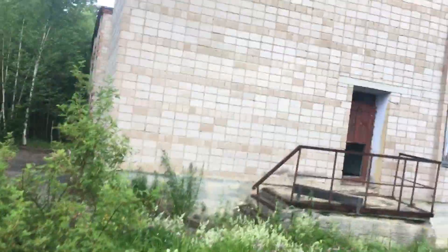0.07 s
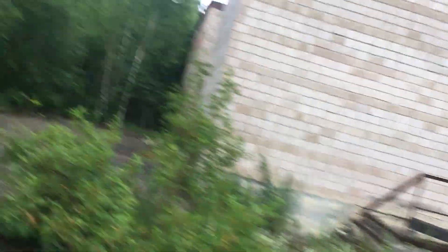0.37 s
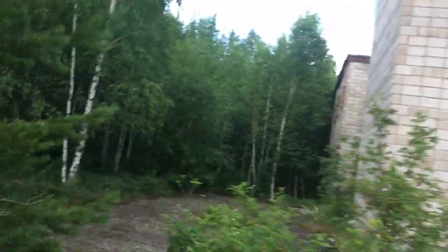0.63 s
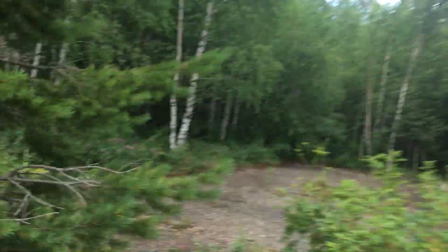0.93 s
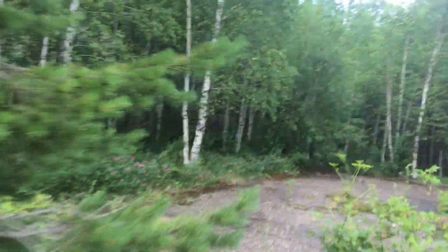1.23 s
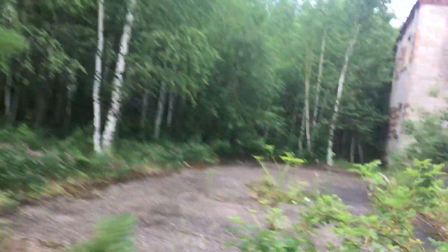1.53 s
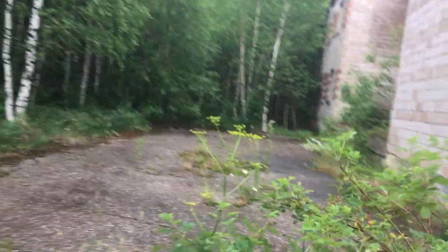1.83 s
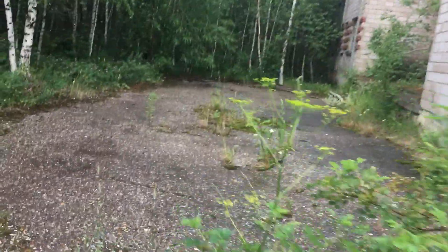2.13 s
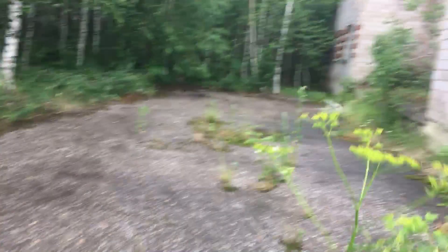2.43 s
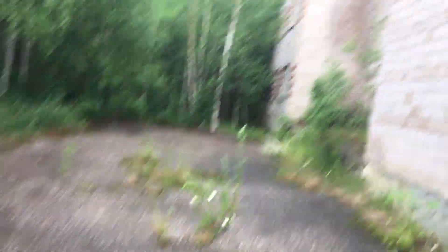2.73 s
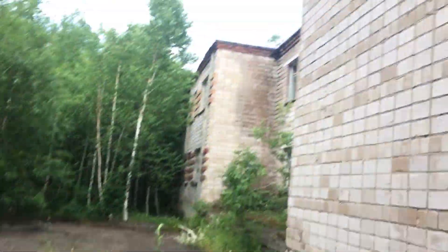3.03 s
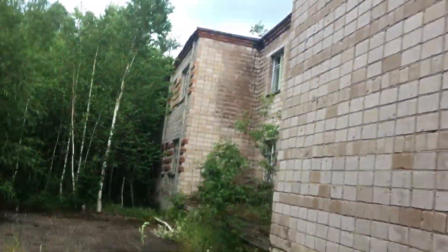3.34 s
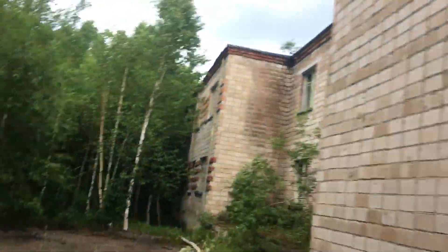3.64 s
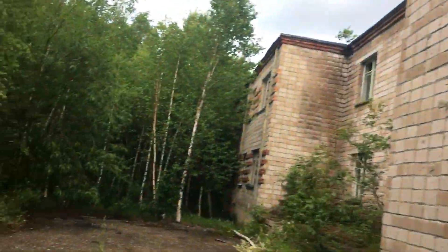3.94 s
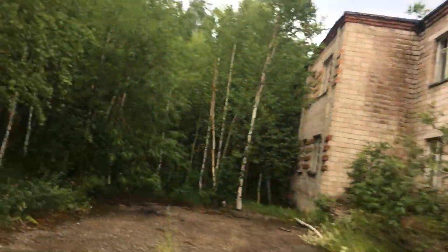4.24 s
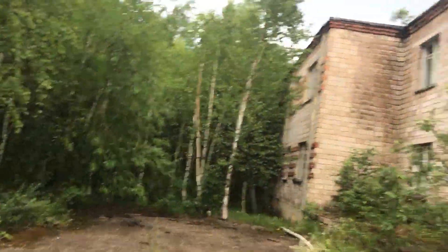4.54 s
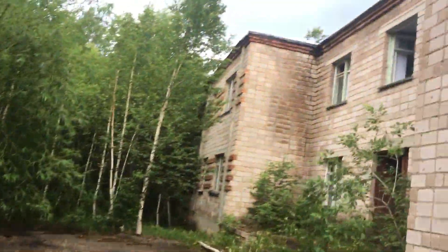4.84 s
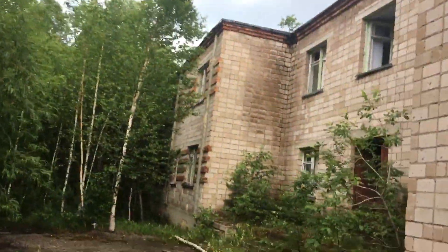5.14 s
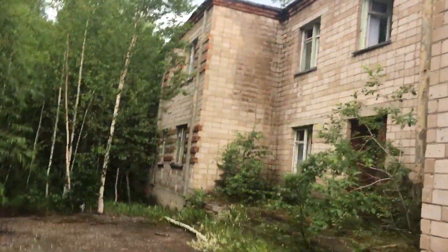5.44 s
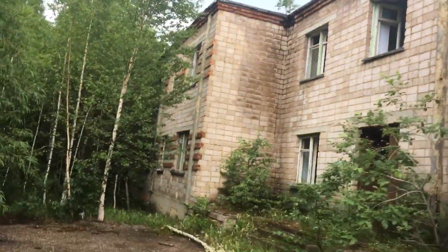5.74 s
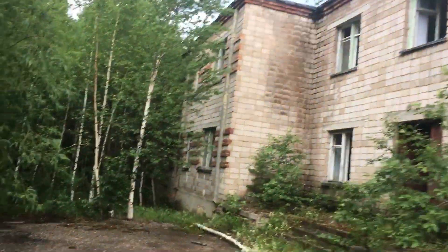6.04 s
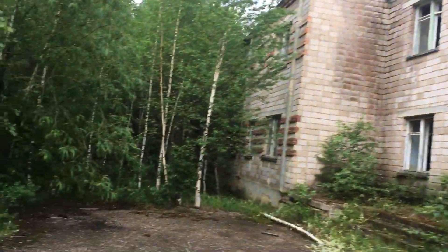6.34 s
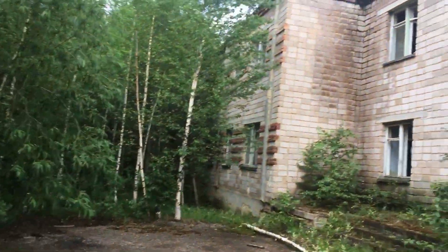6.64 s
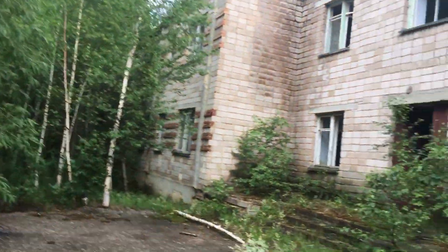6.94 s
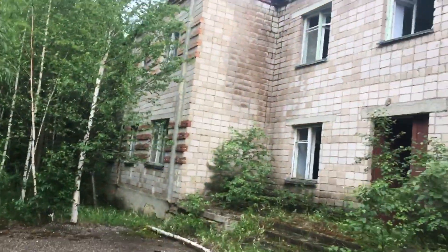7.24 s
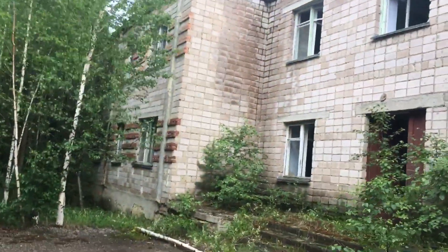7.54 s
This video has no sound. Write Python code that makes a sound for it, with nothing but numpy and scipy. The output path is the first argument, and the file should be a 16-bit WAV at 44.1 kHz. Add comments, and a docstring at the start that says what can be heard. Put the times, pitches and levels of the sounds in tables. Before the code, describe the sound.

Someone walks slowly through overgrown woodland, grit and leaves crunching, twigs cracking underfoot and foliage brushing past a nylon sleeve.

```python
"""A gravel path through undergrowth, walked slowly with a camera in hand. Dry twigs snap and splinter
underfoot; grit, leaves and grass crackle as tiny fractures; soles grind earth. Near the microphone stems tick,
foliage scrapes past, a nylon sleeve swishes and catches, and hollow rasps come in runs. A little wind buffets
the microphone at first with a few low thumps; the woods hush behind."""
import sys
import numpy as np
from scipy import signal
from scipy.fft import rfft, irfft, next_fast_len
from scipy.io import wavfile
from scipy.ndimage import uniform_filter1d, map_coordinates

SR = 44100
rng = np.random.default_rng(int(sys.argv[2]) if len(sys.argv) > 2 else 0)


def store_pcm(level_fs):
    """Save levels as 16-bit WAV."""
    pcm = np.round(np.clip(level_fs, -1, 1) * 32767).astype(np.int16)
    wavfile.write(sys.argv[1], SR, np.atleast_2d(pcm).T)


N = 343186

# twigs and stones cracking: time_s, level_db, pitch_hz
SNAPS = [(0.0434, -22.5, 2640), (0.084, -29, 4200), (0.091, -29, 4500), (0.1205, -32.5, 2140),
         (0.584, -31, 4600), (0.59, -31, 3250), (0.614, -34, 3000), (0.661, -27, 2680),
         (0.698, -33.5, 2400), (0.728, -34, 2120), (0.754, -30, 2210), (0.794, -35.5, 2240),
         (0.844, -31, 2520), (1.097, -29.5, 3160), (1.314, -23, 4060), (1.335, -45, 2900),
         (1.3605, -35, 3300), (1.386, -28.5, 3670), (1.526, -36.5, 3400), (1.6148, -32.5, 2300),
         (1.6658, -38, 1900), (1.804, -31, 4360), (1.937, -40, 2900), (2.0148, -39, 2700),
         (2.1256, -37, 2080), (2.435, -35, 1660), (2.605, -34, 3500), (2.7732, -27.5, 5000),
         (3.072, -22, 1760), (3.1193, -30, 5700), (3.1793, -35, 1950), (3.3298, -34, 3280),
         (3.342, -33, 3540), (3.3686, -27, 3070), (3.388, -35, 3500), (3.716, -36.5, 2400),
         (3.8146, -22.5, 2620), (4.0755, -30.5, 2170), (4.5726, -32, 2020), (4.634, -36.5, 3700),
         (4.8557, -30.5, 1960), (4.8668, -33, 2100), (4.8685, -28, 3300), (4.8728, -15.5, 1920),
         (4.8729, -16.5, 4150), (4.931, -35, 3100), (4.935, -39, 2400), (5.2537, -29.5, 2050),
         (5.446, -30, 4540), (5.46, -34, 3100), (5.632, -36, 3300), (5.988, -34, 2900), (6.0331, -26, 1660),
         (6.0559, -23, 7200), (6.073, -25, 3100), (6.1687, -24.5, 3470), (6.196, -37, 2330),
         (6.202, -33, 3300), (6.207, -31, 3600), (6.2335, -23, 5150), (6.2374, -18, 3130),
         (6.2467, -18.5, 2870), (6.255, -30, 2220), (6.277, -37, 2900), (6.287, -33.5, 2090),
         (6.3136, -26, 4580), (6.328, -34, 2800), (6.358, -31, 3900), (6.3804, -28.5, 2460),
         (6.392, -28.5, 2600), (6.41, -34, 2200), (6.4334, -29, 2580), (6.469, -42, 2600),
         (6.499, -23.5, 3600), (6.52, -32, 2040), (6.5257, -30.5, 2440), (6.592, -37, 3400),
         (6.6578, -35.5, 2170), (6.713, -34.5, 2760), (6.73, -33.5, 2220), (6.792, -32, 3660),
         (6.941, -36.5, 2000), (7.0994, -7, 2090), (7.1022, -25, 2330), (7.1196, -19, 2500),
         (7.214, -33.5, 2140), (7.3614, -36.5, 2720), (7.751, -36, 3300)]
# stones under a break: pitch_hz, level_db, heavy_break_t60_s
STONE_MODES = [(1890, -6, 0.008), (2385, -11.5, 0.02)]
# twigs tearing: start_s, length_s, level_db
SPLINTERS = [(0.017, 0.0065, -38), (1.316, 0.014, -52), (3.518, 0.01, -46.5), (3.595, 0.01, -42),
             (3.892, 0.0061, -43), (3.972, 0.008, -45), (4.08, 0.012, -43.5), (6.744, 0.0093, -50)]
# rustle of the walk: time_s, grit_db, leaves_db, grass_db
RUSTLE_LEVELS = [(0.0, -51.5, -47.5, -46.5), (0.2, -56.5, -52, -47), (0.36, -57.5, -63.5, -64.5),
                 (0.68, -51.5, -55, -58), (0.91, -58, -60, -56.5), (1.32, -57.5, -53.5, -55.5),
                 (1.55, -58, -64, -65), (1.93, -61.5, -59, -55.5), (2.23, -59.5, -61, -64),
                 (2.31, -66, -64, -68), (2.36, -49, -62.5, -68), (2.41, -63, -57.5, -56.5),
                 (2.66, -66.5, -61, -57), (3.05, -57, -57, -52.5), (3.5, -62, -56, -57.5),
                 (3.68, -61, -64, -64), (3.86, -62.5, -55.5, -60), (4.25, -61.5, -66, -66.5),
                 (4.55, -69, -66.5, -73), (4.8, -64, -61, -62), (5.0, -58, -61, -61), (5.09, -59, -56, -57),
                 (5.2, -66, -57, -61), (5.48, -59.5, -56, -61.5), (5.56, -59, -58, -62),
                 (5.61, -61, -59, -62), (5.94, -63.5, -57, -63), (6.05, -58, -51, -61),
                 (6.15, -61, -55.5, -53), (6.35, -56.5, -56, -56), (6.72, -58.5, -56.5, -60),
                 (7.01, -63, -62, -65), (7.25, -59, -59.5, -66), (7.48, -60, -65.5, -66),
                 (7.78, -62.5, -64, -62)]
# footfalls crushing litter: start_s, decay_s, lift_db
CRUNCHES = [(1.313, 0.013, 10), (2.365, 0.022, 10), (2.825, 0.034, 15), (3.33, 0.017, 3),
            (3.585, 0.02, 15.5), (6.742, 0.0077, 14)]
# soles on soft ground: start_s, length_s, level_db, pitch_hz
SCUFFS = [(0.039, 0.032, -48.5, 750), (2.364, 0.079, -57.5, 650), (2.822, 0.1, -57, 526),
          (3.024, 0.22, -58, 634), (3.589, 0.052, -49.5, 650), (3.891, 0.036, -52, 720),
          (3.998, 0.27, -63, 420), (4.933, 0.39, -57, 586), (5.999, 0.048, -56, 520),
          (6.598, 0.26, -61, 410)]
# grinding earth: pitch_ratio, density_db
SOIL_SPECTRUM = [(0.15, -32), (0.5, -2), (0.85, 2.5), (1.15, 1), (1.8, -5.5), (3.5, -12), (7, -38)]
# stems ticking: start_s, level_db, pitch_hz
STEM_TICKS = [(0.9348, -27, 13000), (3.4663, -28, 13000), (4.2937, -31, 13500), (4.4745, -31, 13500),
              (4.7449, -18, 13000), (4.8155, -23, 10500), (4.943, -21, 14800), (5.038, -20, 13400),
              (5.0577, -23, 14000), (5.067, -26, 13500), (5.1003, -24, 13500), (5.1235, -19, 14800),
              (5.128, -25, 14800), (5.2829, -13.5, 14800), (5.388, -15.5, 13200), (6.3135, -5.5, 13600),
              (7.5992, -21, 13400)]
# sleeve strokes: start_s, length_s, level_db
SWISHES = [(1.15, 0.029, -54), (1.459, 0.0053, -62), (1.714, 0.035, -49), (1.8, 0.29, -58.5),
           (2.19, 0.11, -60), (2.548, 0.059, -47), (2.735, 0.075, -52.5), (3.092, 0.022, -47.5),
           (7.151, 0.0048, -45), (7.161, 0.008, -45), (7.191, 0.024, -48)]
# sleeve weave: freq_hz, density_db
NYLON_SPECTRUM = [(300, -31), (900, -15), (1650, -15), (2300, -23), (3500, -4), (4300, -6.5), (5300, 3),
                  (6200, -3), (7700, -16), (10000, -2.5), (11500, -15), (15500, -12.5)]
# foliage against the legs: start_s, length_s, level_db
BRUSHES = [(0.047, 0.027, -37), (0.158, 0.077, -46), (2.925, 0.05, -52), (3.51, 0.058, -50.5),
           (3.572, 0.042, -53), (3.889, 0.018, -51), (5.345, 0.071, -53), (5.495, 0.058, -51.5),
           (5.856, 0.0029, -42.5), (6.008, 0.035, -48), (6.06, 0.07, -64)]
# scraping foliage: freq_hz, density_db
FOLIAGE_SPECTRUM = [(150, -5), (500, -3.5), (1100, -8.5), (1750, -7), (2500, -6.5), (4200, 3.5),
                    (7000, -0.5), (10000, 1), (15500, -15)]
# sleeve catching and slipping: start_s, level_db
CATCHES = [(1.4753, -25.5), (1.479, -23), (7.1522, -29.5)]
# taut nylon: pitch_hz, level_db
CATCH_MODES = [(3500, -15), (5050, 3), (9700, -6)]
# runs of close rasps: start_s, length_s, period_s, level_db
RASP_RUNS = [(0.327, 0.6, 0.085, -60.5), (0.997, 0.43, 0.05, -54.5), (1.504, 0.19, 0.05, -58.5),
             (1.752, 0.2, 0.086, -57), (2.007, 0.16, 0.066, -54.5), (2.249, 0.26, 0.087, -60.5),
             (2.593, 0.19, 0.071, -54.5), (2.823, 0.05, 0.1, -43.5), (3.179, 0.24, 0.094, -57.5),
             (3.512, 0.12, 0.084, -53.5), (5.029, 0.18, 0.131, -55), (5.206, 0.16, 0.065, -57.5),
             (5.448, 0.29, 0.089, -55.5), (5.798, 0.36, 0.1, -54), (6.535, 0.55, 0.11, -58),
             (7.284, 0.53, 0.12, -59)]
# hollow resonances of a rasp: freq_hz, density_db
RASP_SPECTRUM = [(300, -10.5), (1150, -26), (1550, 4), (1850, 2.5), (2450, -14.5), (3300, -7.5), (3800, -2),
                 (5200, -7), (6550, -2), (7600, -7), (9300, -2), (11500, -9), (14400, -12), (15800, -6)]
# wind thumps on the microphone: peak_s, peak_db, pitch_hz
BUMPS = [(0.391, -39.5, 120), (0.453, -32, 116), (0.519, -36, 75), (0.553, -33.5, 100), (0.934, -36.5, 39),
         (1.13, -47, 95), (1.485, -33.5, 90), (1.494, -38, 190), (1.592, -42.5, 95), (1.708, -40.5, 50)]
# one gust: time_s, level_db
GUST = [(0.0, -53.5), (0.354, -55.5), (0.45, -44.5), (0.958, -48.5), (0.984, -59), (1.146, -49), (1.3, -66)]
# puffs of air: start_s, length_s, level_db
PUFFS = [(0.05, 0.037, -58), (0.44, 0.15, -49), (1.36, 0.16, -53.5), (1.482, 0.03, -53),
         (1.65, 0.09, -54.5), (5.62, 0.42, -70), (6.03, 0.14, -54.5)]
# wind on the microphone: freq_hz, density_db
BUFFET_SPECTRUM = [(12, -26), (22, 10), (40, -1), (85, -4), (150, -14.5), (300, -20), (600, -21),
                   (1000, -31), (2000, -60)]
# hush of the trees: freq_hz, density_db
WOODS_SPECTRUM = [(20, 6.5), (60, 1.5), (130, -1), (300, -1), (600, -1.5), (1000, -8), (2000, -14),
                  (4000, -17.5), (9000, -15), (16000, -22.5)]


def twig_snaps(rise_cycles=0.62, ring_db=-17, ring_t60_s=0.012, hiss_db=-33, hiss_t60_s=0.038):
    """A break is one pulse and a faint hiss; fibres give way, the stick shivers and knocks on stones."""
    out, t = np.zeros(N), np.arange(2048) / SR
    for time_s, level_db, pitch_hz in SNAPS:
        snap = pulse(t * pitch_hz, rise_cycles)
        for late, detune in rng.random(size=(3, 2)):
            fibre_delay_s = 0.001 + 0.007 * late
            fibre_hz = pitch_hz * 2 ** (detune - 0.5)
            snap += amp(-15 - 5 * late) * pulse((t - fibre_delay_s) * fibre_hz, rise_cycles)
        shiver = rng.standard_normal(len(t)) * amp(-60 * t / ring_t60_s) * (t > 0.0005)
        ring = signal.fftconvolve(pulse(t * pitch_hz, rise_cycles=1.42), shiver)[:len(t)]
        ring *= amp(ring_db) * np.linalg.norm(snap) / np.linalg.norm(ring)
        knock = signal.fftconvolve(snap, stone_ring(t, level_db))[:len(t)] / np.sum(np.abs(snap))
        wood_damping = signal.butter(4, min(1.5 * pitch_hz, SR / 3), fs=SR, output="sos")
        wood = signal.sosfilt(wood_damping, snap + ring + knock)
        hiss = amp(hiss_db - 60 * t / hiss_t60_s) * rng.standard_normal(len(t))
        add(out, time_s - 1 / pitch_hz, amp(level_db - 0.1) * (wood + hiss))
    # thin sticks radiate no bass
    return signal.sosfilt(signal.butter(2, 520, "highpass", fs=SR, output="sos"), out)


def stone_ring(t, break_db, heavy_break_db=-15, pitch_spread=0.035):
    """No two stones ring alike; a heavier break rings them longer."""
    stretch = amp(0.24 * (break_db - heavy_break_db))
    ring = np.zeros(len(t))
    for pitch_hz, level_db, t60_s in STONE_MODES:
        detuned_hz = pitch_hz * (1 + pitch_spread * rng.normal())
        ring += amp(level_db - 60 * t / (t60_s * stretch)) * np.cos(2 * np.pi * detuned_hz * t)
    return ring


def twig_splinters():
    """A twig tears in a ragged run of small fractures."""
    fractures = grains(per_s=1500, centre_hz=1970, spread_oct=0.24, rise_cycles=0.73, scatter_db=4.5)
    return strokes(SPLINTERS, edge_share=0.79) * fractures


def undergrowth():
    """Weight crushes grit, leaves and grass in a fine crackle; small stones click out."""
    grit_db, leaves_db, grass_db = curves(RUSTLE_LEVELS)
    clumps = wobble(45)
    grit = amp(grit_db - 2.5 + 2 * clumps + 1.3 * wobble(150))
    grit *= grains(per_s=1400, centre_hz=2066, spread_oct=0.45, rise_cycles=0.7, scatter_db=1)
    leaves = amp(leaves_db - 1.53 + 2.3 * clumps)
    leaves *= grains(per_s=4500, centre_hz=5830, spread_oct=0.71, rise_cycles=1.39, scatter_db=3.5, n=130)
    grass = amp(grass_db - 1.44 + 1.7 * clumps + 3.4 * wobble(99))
    grass *= grains(per_s=4900, centre_hz=12160, spread_oct=0.464, rise_cycles=1.72, scatter_db=5, n=100)
    stones = amp((grit_db + leaves_db) / 2 - 4)
    stones *= grains(per_s=170, centre_hz=3700, spread_oct=0.95, rise_cycles=0.8, scatter_db=4, n=300)
    return amp(footfall_lift_db()) * patchy(grit + leaves + grass, depth_db=2.5) + stones


def footfall_lift_db(attack_s=0.00067):
    """A footfall crushes the litter at once: the rustle jumps, then decays."""
    out, t = np.zeros(N), np.arange(SR // 3) / SR
    for start_s, decay_s, lift_db in CRUNCHES:
        add(out, start_s, lift_db * (1 - np.exp(-t / attack_s)) * np.exp(-t / decay_s))
    return out


def sole_scuffs():
    """Soft earth gives way in a dull, uneven grinding; each step has its own resonance."""
    out = np.zeros(N)
    grinding = patchy(rng.standard_normal(N) * amp(3.7 * wobble(500)), depth_db=3, frame_samples=768)
    for start_s, length_s, level_db, pitch_hz in SCUFFS:
        spectrum = [(pitch_hz * ratio, density_db) for ratio, density_db in SOIL_SPECTRUM]
        out += strokes([(start_s, length_s, level_db)], edge_share=0.16) * coloured(grinding, spectrum)
    return out


def stem_ticks(fizz_db=-17, fizz_t60_s=0.0056):
    """Stems give short, high ticks with a brief fizz at the same pitch."""
    out, t = np.zeros(N), np.arange(512) / SR
    for start_s, level_db, pitch_hz in STEM_TICKS:
        tick = pulse(t * pitch_hz, rise_cycles=1.07)
        burst = rng.standard_normal(len(t)) * amp(fizz_db - 60 * t / fizz_t60_s)
        fizz = np.convolve(burst, tick / np.linalg.norm(tick))[:len(t)]
        add(out, start_s, amp(level_db - 3.5) * (tick + fizz))
    return out


def sleeve_swishes():
    """Rubbed nylon weave hisses in broad resonances."""
    weave = coloured(rng.standard_normal(N) * amp(2.3 * wobble(220)), NYLON_SPECTRUM)
    return amp(4) * strokes(SWISHES, edge_share=0.56) * weave


def foliage_brushes():
    """Foliage scrapes past the legs with a coarse grain."""
    scrape = rng.standard_normal(N) * amp(1.7 * wobble(2500) + 3.2 * wobble(180))
    return amp(0.4) * strokes(BRUSHES, edge_share=0.27) * coloured(scrape, FOLIAGE_SPECTRUM)


def sleeve_catches(rise_s=0.000347):
    """Taut nylon lets go and rings for about a millisecond."""
    out, t = np.zeros(N), np.arange(512) / SR
    tick = sum(amp(mode_db) * pulse(t * hz, rise_s * hz) for hz, mode_db in CATCH_MODES)
    for start_s, level_db in CATCHES:
        add(out, start_s, amp(level_db) * tick)
    return out


def stalk_drag(start_s=5.5, length_s=0.094, level_db=-39, slips_per_s=165, rise_cycles=0.92):
    """A dry stalk sticks and slips over cloth in a quick row of ticks."""
    out, t = np.zeros(N), np.arange(256) / SR
    tick = pulse(t * 4000, rise_cycles) + amp(-0.5) * pulse(t * 9500, rise_cycles)
    for slip, (late, louder) in enumerate(rng.standard_normal(size=(24, 2))):
        if slip / slips_per_s < length_s:
            add(out, start_s + (slip + 0.45 * late) / slips_per_s, amp(level_db + 2 * louder) * tick)
    return out


def hollow_rasps(slip_s=0.018, attack_s=0.0032, jitter_s=0.0011, scatter_db=1.5):
    """Small slips, as of a casing in the grip, each excite the same hollow resonances."""
    envelope, t = np.zeros(N), np.arange(SR // 20) / SR
    slip = (1 - np.exp(-t / attack_s)) * amp(-4 * t / slip_s) / (1 + (t / slip_s) ** 8)
    for start_s, length_s, period_s, level_db in RASP_RUNS:
        times_s = np.arange(start_s, start_s + length_s, period_s)
        for time_s, (late, louder) in zip(times_s, rng.standard_normal(size=(12, 2))):
            add(envelope, time_s + jitter_s * late, amp(level_db + 9.5 + scatter_db * louder) * slip)
    return envelope * coloured(rng.standard_normal(N) * amp(2.6 * wobble(900)), RASP_SPECTRUM)


def wind_thumps(rise_cycles=0.4):
    """Each thump of wind gives the microphone one slow, heavily damped swing."""
    out, t = np.zeros(N), np.arange(SR // 6) / SR
    for peak_s, peak_db, pitch_hz in BUMPS:
        add(out, peak_s - rise_cycles / pitch_hz, amp(peak_db) * pulse(t * pitch_hz, rise_cycles))
    return out


def wind_buffet(calm_s=3.1, calm_db=-73, flutter_db=1.5):
    """A dying gust and a few puffs rumble on the microphone."""
    gust_db, = curves(list(GUST) + [(calm_s, calm_db)])
    gust = amp(gust_db + 0.5 + flutter_db * wobble(13.76))
    puffs = strokes(PUFFS, edge_share=0.78)
    return (gust + puffs) * coloured(rng.standard_normal(N), BUFFET_SPECTRUM)


def woods_hush(level_db=-59):
    """The trees give a low, slightly wavering hush."""
    return amp(level_db + 1.3 * wobble(3.47)) * coloured(rng.standard_normal(N), WOODS_SPECTRUM)


def with_reflections(x, tail_db=-20, t60_s=0.25):
    """Trunks and a brick wall add a thin, dense tail."""
    t = np.arange(int(1.5 * t60_s * SR) + 64) / SR
    tail = rng.standard_normal(len(t)) * amp(-60 * t / t60_s) * (1 - np.exp(-8 * t / t60_s))
    return x + amp(tail_db) * signal.fftconvolve(x, tail / np.linalg.norm(tail))[:len(x)]


def pulse(cycles, rise_cycles):
    """A heavily damped ring that peaks at 1 after rise_cycles."""
    age = np.maximum(cycles, 0) / rise_cycles
    return (age * np.exp(1 - age)) ** 2 * np.cos(2 * np.pi * (cycles - rise_cycles))


def grains(per_s, centre_hz, spread_oct, rise_cycles, scatter_db, n=200, ring_db=-13, ring_t60_s=0.017):
    """Tiny fractures at rms 1, each a click and faint ring of n samples; a few stand out."""
    grain_rng = np.random.default_rng(rng.integers(2 ** 31))
    when, pitch, strength, sign = grain_rng.random((int(per_s * N / SR), 4)).T
    pitch_hz = np.minimum(centre_hz * 2 ** (spread_oct * (2 * pitch - 1)), SR / 2)
    gain = amp(scatter_db * np.minimum(-np.log(1 - strength), 3.5)) * np.sign(sign - 0.5)
    offsets = np.arange(n)
    cycles = pitch_hz[:, None] * offsets / SR
    rings = amp(ring_db - 60 * offsets / SR / ring_t60_s) * np.sin(2 * np.pi * cycles)
    fractures = gain[:, None] * (pulse(cycles, rise_cycles) + rings)
    positions = (when * N).astype(int)[:, None] + offsets
    return unit(np.bincount(positions.ravel(), fractures.ravel(), N)[:N])


def strokes(rows, edge_share):
    """Envelope of strokes, each swelling and fading for edge_share of its span."""
    envelope = np.zeros(N)
    for start_s, length_s, level_db in rows:
        samples = max(int(length_s * SR * (1 + edge_share / 2)), 8)
        shape = signal.windows.tukey(samples, edge_share)
        add(envelope, start_s - length_s * edge_share / 4, amp(level_db) * shape)
    return envelope


def patchy(x, depth_db, frame_samples=256):
    """Each leaf and fold has its own colour: random gain patches in pitch and time."""
    spectra = signal.stft(x, nperseg=frame_samples)[2]
    patches = rng.standard_normal(spectra.shape)
    for _ in range(2):
        patches = uniform_filter1d(patches, size=3, axis=0)
        patches = uniform_filter1d(patches, size=6, axis=1)
    mottled = signal.istft(spectra * amp(depth_db * unit(patches)), nperseg=frame_samples)[1][:N]
    return unit(mottled) * np.std(x)


def coloured(x, spectrum):
    """x shaped by a spectrum, at rms 1."""
    freq_hz, density_db = np.transpose(spectrum)
    return unit(filtered(x, lambda hz: amp(np.interp(np.log(hz + 1), np.log(freq_hz), density_db))))


def filtered(x, gain_at_hz):
    size = next_fast_len(N + 8192)
    return irfft(rfft(x, size) * gain_at_hz(np.fft.rfftfreq(size, 1 / SR)), size)[:N]


def curves(rows):
    """One value per sample for each column after time_s."""
    time_s, *columns = np.transpose(rows)
    return [np.interp(np.arange(N) / SR, time_s, column) for column in columns]


def wobble(knots_per_s):
    """A smooth random curve."""
    knots = rng.standard_normal(int(N * knots_per_s / SR) + 4)
    return map_coordinates(knots, [np.arange(N) * knots_per_s / SR])


def add(track, start_s, sound):
    start = int(np.clip(round(start_s * SR), 0, N - 1))
    track[start:start + len(sound)] += sound[:N - start]


def amp(db):
    return 10 ** (np.asarray(db) / 20)


def unit(x):
    return x / np.sqrt(np.mean(x ** 2) + 1e-20)


def scene():
    """Mono mix; only the breaking twigs get reflections."""
    cracks = with_reflections(twig_snaps() + twig_splinters())
    scuffs = sole_scuffs()
    rubbing = patchy(sleeve_swishes() + foliage_brushes() + hollow_rasps(), depth_db=1.5)
    ticks = stem_ticks() + stalk_drag() + sleeve_catches()
    walk = cracks + undergrowth() + scuffs + rubbing + ticks + wind_thumps()
    return (walk + wind_buffet() + woods_hush())[None]


def record(dry):
    """The camera's band limit cuts the top treble."""
    cutoff_hz, transition_hz = 15950, 300
    return filtered(dry[0], lambda hz: np.clip((cutoff_hz - hz) / transition_hz + 0.5, 0, 1))[None]


dry = scene()
out = record(dry)
store_pcm(out)
```